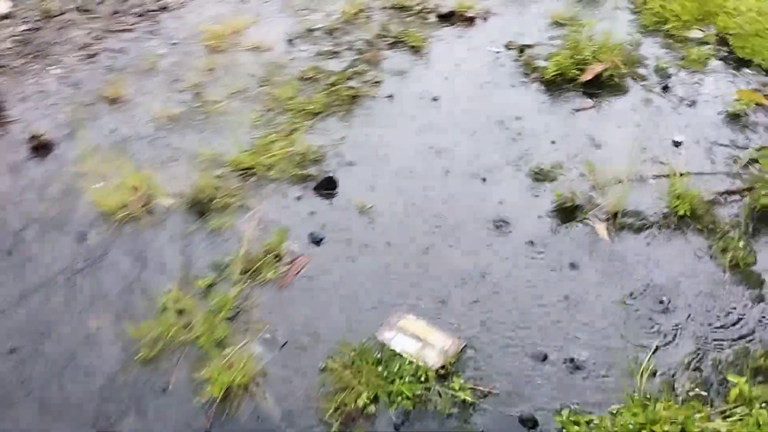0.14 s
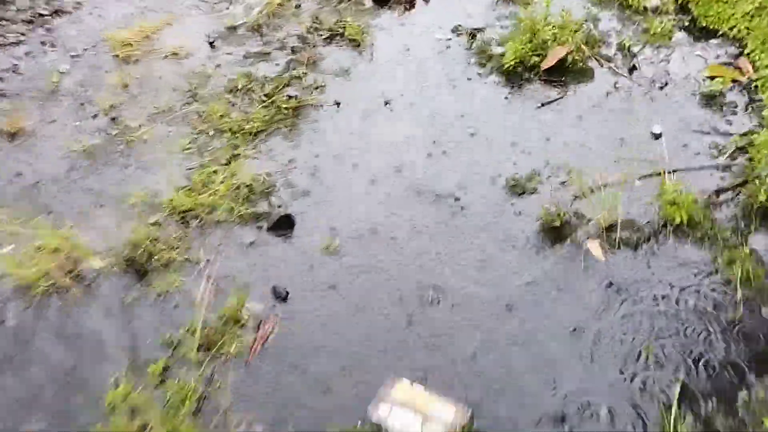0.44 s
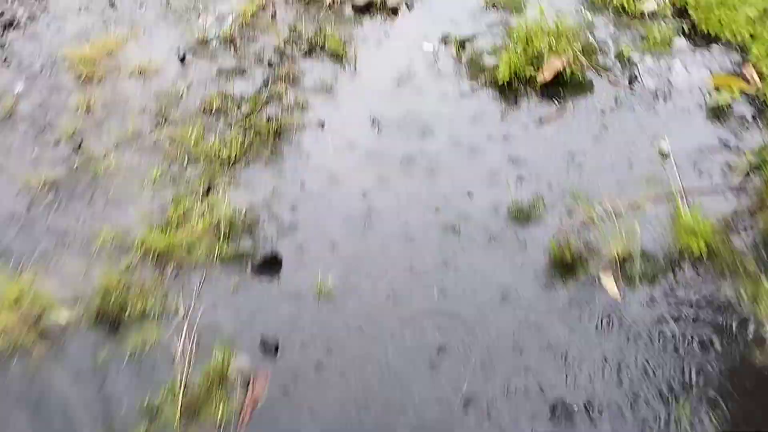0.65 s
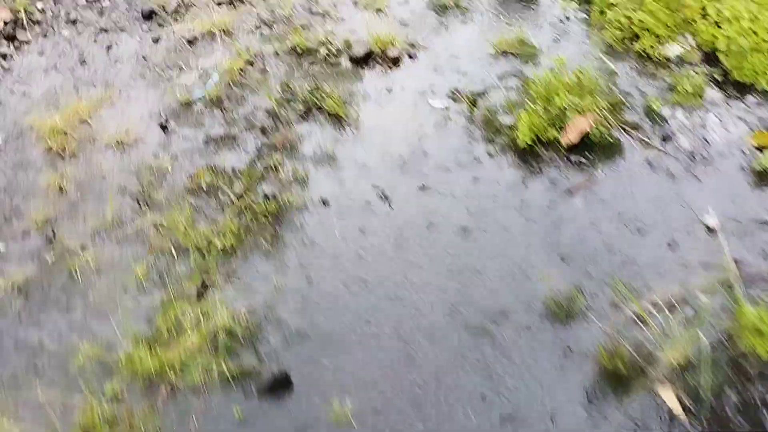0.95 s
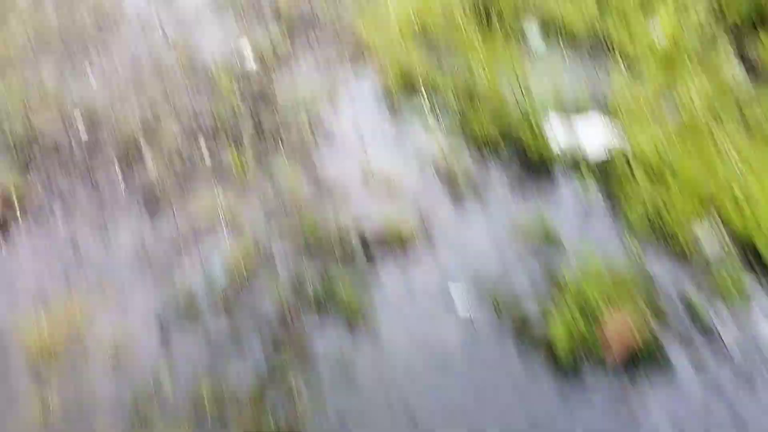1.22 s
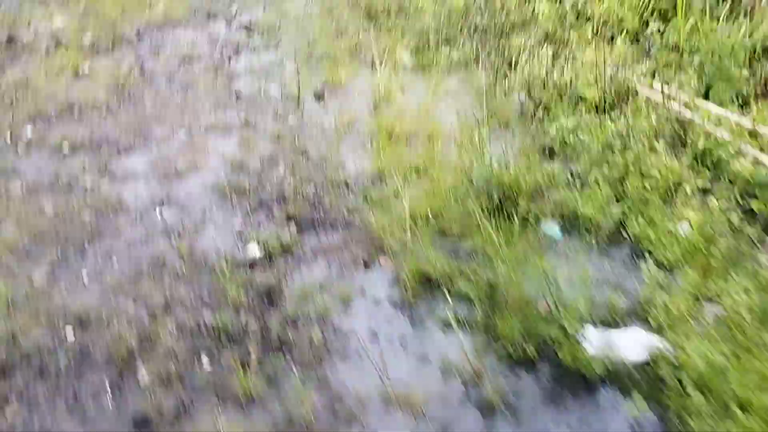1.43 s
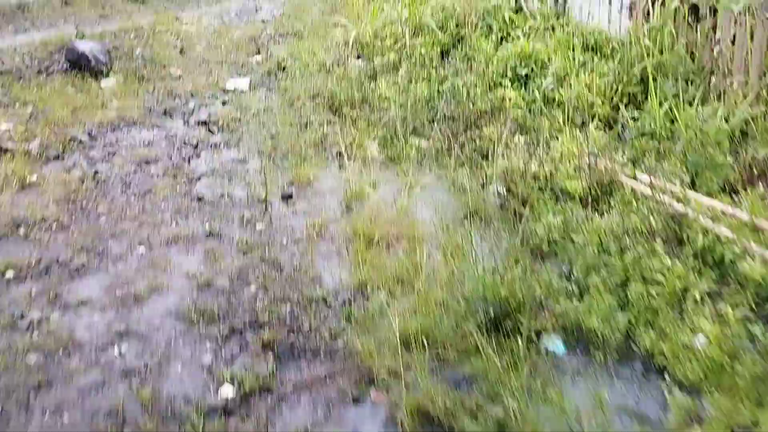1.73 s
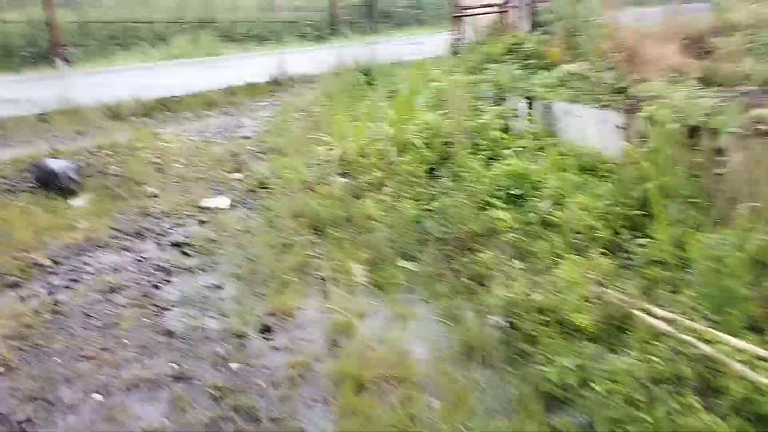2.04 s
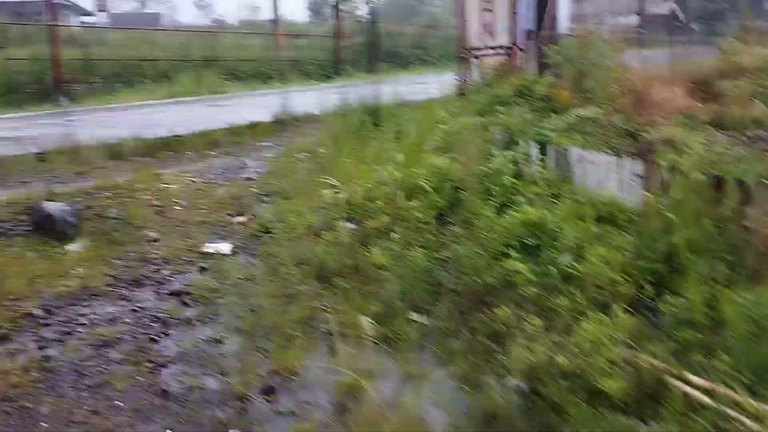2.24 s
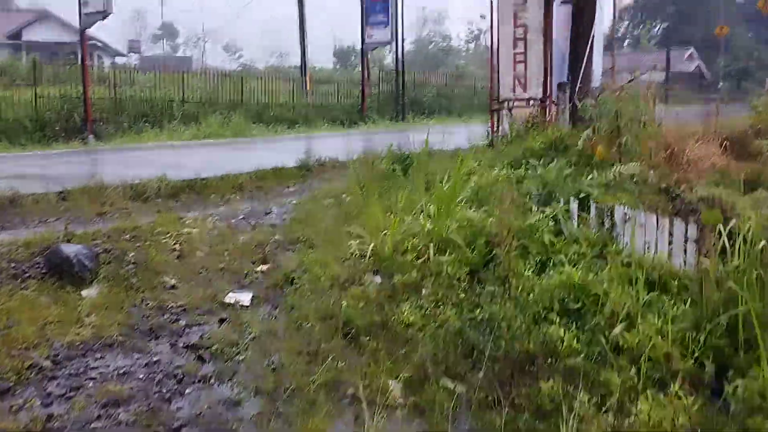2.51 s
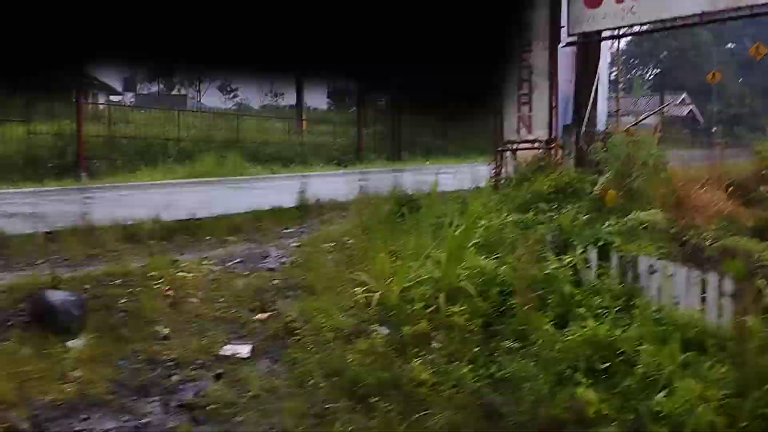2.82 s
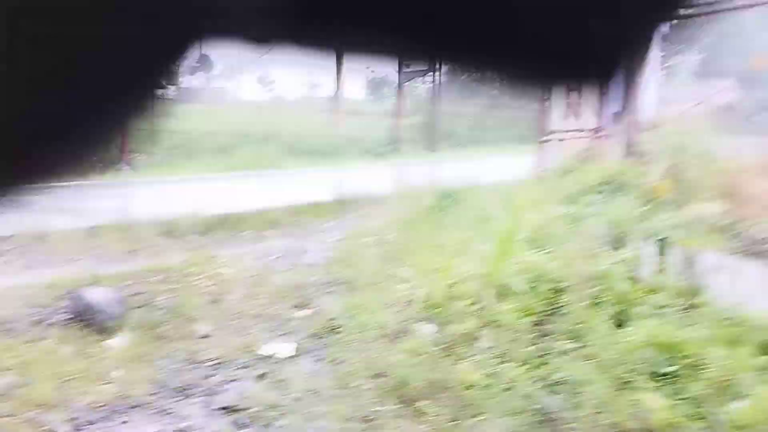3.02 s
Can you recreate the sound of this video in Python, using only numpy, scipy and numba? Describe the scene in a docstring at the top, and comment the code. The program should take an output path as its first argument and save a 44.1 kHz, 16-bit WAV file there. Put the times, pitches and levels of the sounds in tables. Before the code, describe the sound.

Heavy rain hisses steadily over puddles and grass while vehicle engines drone low on the left

```python
"""Beside a wet road bordered by grass, gravel and puddles, heavy rain reaches the two ports of a hand-held phone.
Filtered noise and damped rings form the dense wash; wavelets form near drops, noise bursts the splashes.
On the road to the left, filtered noise forms tyre rumble, and sines form a droning engine that leaves,
a second engine that draws near, a low hum and a tone that dies away. A soft bump strikes the phone;
at the end a hand closes over it, with two bands of ringing hiss from sines of randomly wavering pitch."""
import sys
import numpy as np
from scipy import signal
from scipy.fft import rfft, irfft
from scipy.io import wavfile
from scipy.ndimage import uniform_filter1d
from numba import njit

SR = 44100
rng = np.random.default_rng(int(sys.argv[2]) if len(sys.argv) > 2 else 0)


def transcribe(u):
    """Save the signal u as a 16-bit wav file named by the first command-line argument.

    u: samples, shape (n,) or (channels, n), limited to [-1, 1]; the rate is SR.
    q: integer samples, one column per channel.
    """
    v = np.clip(np.atleast_2d(u).T, -1, 1)
    q = np.round(v * 32767).astype(np.int16)
    wavfile.write(sys.argv[1], SR, q)


def field_ratio(decibels):
    """Amplitude ratio for a level in dB (20 dB per decade); scalars and array-likes work."""
    return 10 ** (np.asarray(decibels, dtype=float) / 20)


N = 139797

# Frequency response of the two phone ports: f/Hz, left gain/dB, right gain/dB
PORT_RESPONSE = [(573, -1, -1.5), (1260, -1.5, -1.5), (1500, -6, -2), (2240, -3.5, 3), (2780, -2.5, 0),
                 (4730, -1.5, -4), (6740, -3.5, 0), (7300, -6, -0.5), (8200, -11, -10.5), (9100, -6, -3),
                 (10000, -5.5, -6), (11030, -6, -23), (11780, 0.5, -5), (12300, 6.5, -6.5),
                 (14000, 7, -1.5), (15200, 6.5, -2)]
BAND_LIMIT_HZ = 15760  # upper band limit of the finished mix
LAG_S = 20 / 44100  # sound from the left reaches the right port later

# Spectral density of the rain wash, relative: f/Hz, level/dB per Hz
WASH_SPECTRUM = [(400, -5), (1000, -4), (2200, -6), (4000, -11.5), (7000, -18), (11000, -22),
                 (16000, -26.5)]
# Course of the wash: t/s, level/dB (before WASH_GAIN_DB), extra treble level/dB
WASH_COURSE = [(0, -44, -1.5), (.3, -45.5, 1), (.5, -45.5, -1.5), (1.2, -46, 2), (1.4, -43.5, 0),
               (1.6, -44.5, 0), (2.36, -43.5, -1), (2.8, -42.5, 1.5), (3.17, -42.5, 1)]
WASH_GAIN_DB, WASH_TREBLE_HZ = 4, 3300
# Flicker of the hiss; patter drops in each noise stream, their size spread, their level against the hiss
FLICKER_DB, DROPS_PER_S, SIZE_SPREAD_DB, PATTER_DB = 1.5, 1100, 3.5, -5
# Share of the power that arrives from the road side: f/Hz, share/1
ROAD_SHARE = [(100, 0.96), (300, 0.94), (600, 0.12), (1200, 0.64), (2200, 0.13), (5000, 0), (12000, 0.02)]

# Spectral density of the road rumble, relative: f/Hz, level/dB per Hz
RUMBLE_SPECTRUM = [(15, -40), (25, -17), (55, -9), (80, -1), (100, -6.5), (200, -7.5), (250, -7.5),
                   (340, -12), (1200, -29.5)]
# Course of the rumble: t/s, level/dB, extra level of the upper part/dB
RUMBLE_COURSE = [(0, -32, -2.5), (2.2, -30.5, -2), (3.17, -27, 0.5)]
RUMBLE_UPPER_HZ = 280

# Fundamental of the droning engine: t/s, level/dB
DRONE_LEVEL = [(0, -33), (.4, -31), (.63, -24), (.87, -28), (1.05, -25.5), (1.27, -19.5), (1.42, -28.5),
               (1.6, -22.5), (1.76, -18), (1.8, -21.5), (1.85, -41), (1.95, -34), (2.06, -41), (2.3, -44),
               (3.17, -65)]
DRONE_HZ, DRONE_SAG_HZ_PER_S = 72.33, 1.05  # initial pitch and its steady fall
# Low hum, before its random waver: t/s, f/Hz, level/dB
HUM_COURSE = [(0, 95.76, -34.5), (.4, 96, -35.5), (1.5, 102.8, -38.5), (2.2, 108, -36.5),
              (2.6, 112.2, -28.5), (3.0, 117.5, -31), (3.17, 113.4, -40)]
# Base rate of the nearing engine, multiplied by each order: t/s, f/Hz
ENGINE_RATE = [(0, 49.06), (1.1, 50.91), (2.0, 52.76), (2.6, 52.97), (3.17, 53.8)]
# Base level of the nearing engine, to which each order adds its own: t/s, level/dB
ENGINE_LEVEL = [(0, -40), (.6, -40), (1.3, -39.5), (1.4, -35), (1.5, -38.5), (1.6, -35.5), (1.85, -31.5),
                (1.93, -45.5), (2.05, -31), (2.13, -39.5), (2.25, -31), (2.33, -37.5), (2.45, -30),
                (2.53, -42), (2.58, -29.5), (2.7, -40), (2.8, -31.5), (2.89, -42), (3.0, -33.5),
                (3.17, -38)]
# Orders of the nearing engine: order/1, relative level at 2.5 s/dB, growth/dB per s
ENGINE_ORDERS = [(3, -6.5, -0.5), (4, -6.5, -0.5), (5, 3, 2.5), (6, -11.5, 2.5), (7, -10, 9), (10, -18, 15),
                 (17, -15.5, 10), (20, -16.5, 10)]
ENGINE_WAVER_DB = 3.5
FADING_TONE_HZ, FADING_TONE_DB, FADING_TONE_HOLD_S = 163, -34.5, 0.25

# Splashes of fine spray: t/s, envelope peak level/dB, relative level below 7 kHz/dB, t60/s
SPLASH_EVENTS = [(0.057, -43.5, -1, .02), (0.123, -37, 9, 0.043), (.203, -42.5, 8, 0.051),
                 (.2487, -45.5, 8, 0.083), (.578, -38, -10, .015), (0.603, -35.5, -3, 0.011),
                 (1.348, -41, 5, .08), (1.36, -45, 5, 0.061), (1.382, -43.5, 12, 0.072),
                 (1.431, -39, 2, .04), (2.1598, -36, -8, .025), (2.1774, -35.5, -4, 0.044),
                 (2.6635, -42, -6, .02)]
SPLASH_RIGHT_DB, SPLASH_RISE_S = -3, 0.011  # gain at the right port; time of a 60 dB rise
# Near drops: t/s, peak level/dB, left minus right level/dB, ring f/Hz, width/cycles, relative snap level/dB
DROP_EVENTS = [(.6037, -19.5, 3, 1080, .22, -11), (.7143, -24, -5, 1100, .3, -9),
               (.826, -30, -4, 1000, .32, -9), (.8575, -31, -3, 2400, .5, -8),
               (.872, -31.5, -5, 4000, 1.1, -12), (.9048, -23, -3, 1100, .26, -18),
               (1.3735, -29, -4, 1200, .5, -16), (1.393, -32, -4, 2400, 1.8, -12),
               (1.4178, -24.5, -6, 2000, .6, -16), (1.6275, -29, -5, 2100, .45, -7),
               (1.7066, -24, -5, 1700, .4, -20), (1.8904, -21, 3, 1500, .26, -24),
               (1.9668, -23, 2, 700, .3, -12), (2.0548, -24, 5, 2200, .7, -14),
               (2.176, -30, 0, 2020, 1.2, -14), (2.3184, -21.5, -4, 1450, .36, -22)]
SNAP_HZ = 4530  # sharp snap on top of each drop
BUMP_S, BUMP_PEAK_DB, BUMP_HZ = 1.9428, -14.5, 227

CUPPING_S, CUPPING_LENGTH_S, CUPPING_EDGE_S, CUPPING_RIGHT_DELAY_S = 2.895, .215, .04, .025
# Ringing hiss under the closing hand: centre f/Hz, waver of f/Hz, level/dB
RINGING_BANDS = [(2355, 55, -49), (5940, 105, -50.5)]


def curve(table, col, t):
    """Piecewise-linear interpolation of a table column in time."""
    a = np.array(table, float)
    return np.interp(t, a[:, 0], a[:, col])


def bins_hz():
    """Frequencies of the discrete Fourier transform."""
    return np.fft.rfftfreq(N, 1 / SR)


def over_hz(table, col=1):
    """Interpolation of a spectrum, linear in log frequency."""
    a = np.array(table, float)
    return np.interp(np.log(bins_hz() + 1), np.log(a[:, 0]), a[:, col])


def colour(x, gain):
    """Linear filtering: each Fourier component is multiplied by its gain."""
    return irfft(rfft(x) * gain, N)


def high_pass(corner_hz, order=4):
    """Zero-phase high-pass gain, rising with the given power of frequency."""
    return 1 / (1 + (corner_hz / (bins_hz() + 1)) ** order)


def unit(x):
    """Normalisation to unit rms."""
    return x / np.sqrt(np.mean(x ** 2))


def walk(rate):
    """Slow random modulation: Gaussian levels held 1 / rate seconds and smoothed twice; spread near 1."""
    k = int(SR / rate)
    held = np.repeat(rng.standard_normal(N // k + 1), k)
    return 1.21 * uniform_filter1d(uniform_filter1d(held, k), k)[:N]


def from_left(x):
    """Arrival-time difference: a wave from the left reaches the right port later."""
    return np.array([x, colour(x, np.exp(-2j * np.pi * bins_hz() * LAG_S))])


def spread(make):
    """Partial coherence: a shared part from the road side plus an independent part at each port."""
    share = np.clip(over_hz(ROAD_SHARE), 0, 1)
    shared = from_left(colour(make(), np.sqrt(share)))
    return shared + colour(np.array([make(), make()]), np.sqrt(1 - share))


def tone(hz, db):
    """Phase integration: a sine follows an instantaneous frequency and an rms level."""
    return np.sqrt(2) * field_ratio(db) * np.sin(2 * np.pi * (np.cumsum(hz) / SR + rng.random()))


def wavelet(a, width):
    """Gaussian-windowed oscillation: a dip with side lobes; a counts cycles from its centre."""
    return -np.cos(2 * np.pi * a) * np.exp(-(a / width) ** 2)


@njit
def grains(rows, n):
    """Damped free oscillation: a decaying ring per row of (sample, Hz, cycles, size)."""
    out = np.zeros(n)
    for r in rows:
        w = 2 * np.pi * r[1] / SR
        p, z = np.exp(1j * w - r[1] / SR / r[2]), r[3] + 0j
        for i in range(int(r[0]), min(n, int(r[0] + 6 * r[2] * SR / r[1]))):
            out[i] += z.imag
            z *= p
    return out


def rain_stream():
    """Superposition of impacts: far drops merge to flickering hiss, nearer ones patter as uneven rings."""
    u = rng.random((int(DROPS_PER_S * N / SR), 4))
    hz = 700 * 20 ** u[:, 1]
    size = field_ratio(-SIZE_SPREAD_DB * np.log(1.003 - u[:, 2])) * np.sqrt(hz)  # few large drops
    cycles = 1 + 3 * u[:, 3] ** 2
    patter = grains(np.c_[u[:, 0] * N, hz, cycles, size * np.sqrt(hz / cycles)], N)
    hiss = rng.standard_normal(N) * field_ratio(FLICKER_DB * walk(20))
    return hiss + field_ratio(PATTER_DB) * unit(patter)


def rain(t):
    """Spectral shaping of many impacts: partly coherent streams make a wash of varying level and treble."""
    wash = unit(colour(spread(rain_stream), field_ratio(over_hz(WASH_SPECTRUM))))
    treble = colour(wash, high_pass(WASH_TREBLE_HZ))
    wash = wash + treble * (field_ratio(curve(WASH_COURSE, 2, t)) - 1)
    return wash * field_ratio(curve(WASH_COURSE, 1, t) + WASH_GAIN_DB)


def rumble(t):
    """Broadband noise of tyres and far traffic: its upper part gains level as the rumble grows."""
    gain = field_ratio(over_hz(RUMBLE_SPECTRUM)) / (1 + (bins_hz() / 1200) ** 6)
    x = unit(colour(spread(lambda: rng.standard_normal(N)), gain))
    upper = colour(x, high_pass(RUMBLE_UPPER_HZ))
    x = x - upper + upper * field_ratio(curve(RUMBLE_COURSE, 2, t))
    return x * field_ratio(curve(RUMBLE_COURSE, 1, t))


def droning_engine(t):
    """Harmonic radiation from an exhaust: a sagging fundamental and its wavering second harmonic."""
    hz = DRONE_HZ - DRONE_SAG_HZ_PER_S * t
    second_db = -39 + 4 * walk(6.0) - 25 * np.clip(t - .9, 0, 1)
    return tone(hz, curve(DRONE_LEVEL, 1, t)) + tone(2 * hz, second_db)


def low_hum(t):
    """Frequency modulation: a low tone climbs, then dips at the end, with random waver of pitch and level."""
    hz = curve(HUM_COURSE, 1, t) * (1 + .02 * walk(10))
    return tone(hz, curve(HUM_COURSE, 2, t) + 2.5 * walk(15))


def nearing_engine(t):
    """Engine orders: exhaust tones at multiples of a rising rate, each wavering alone."""
    hz, db = curve(ENGINE_RATE, 1, t), curve(ENGINE_LEVEL, 1, t)
    mean_db = uniform_filter1d(db, SR // 2)
    out = np.zeros(N)
    for order, rel_db, growth in ENGINE_ORDERS:
        # order 5 follows the level closely, the others only its half-second mean
        base_db = db if order == 5 else mean_db + ENGINE_WAVER_DB * walk(7.92)
        order_hz = order * hz * (1 + .003 * walk(12))
        out = out + tone(order_hz, base_db + rel_db + growth * (t - 2.5) + 1.43 * walk(25.06))
    return out


def fading_tone(t):
    """Exponential decay: a steady pitch holds briefly, then falls by 100 dB in a second."""
    fall_db = 100 * np.clip(t - FADING_TONE_HOLD_S, 0, 1)
    return tone(np.full(N, FADING_TONE_HZ), FADING_TONE_DB + 2 * walk(11.2) - fall_db)


def engines(t):
    """Linear superposition: the vehicle tones share one path from the left."""
    return from_left(droning_engine(t) + low_hum(t) + nearing_engine(t) + fading_tone(t))


def splashes(t):
    """Transient broadband radiation: spray is grainy noise under exponential rises and decays."""
    s = np.array(SPLASH_EVENTS, float)
    age = t - s[:, :1]
    t60 = np.where(age > 0, np.maximum(s[:, 3:], .005), SPLASH_RISE_S)
    env = field_ratio(s[:, 1:2] - 60 * np.abs(age) / t60)
    grain = field_ratio(3.5 * rng.standard_normal((2, N // 20 + 1))).repeat(20, axis=1)[:, :N]
    noise = rng.standard_normal((2, N)) * grain
    low = 1 / (1 + (bins_hz() / 7000) ** 4)
    spray = colour(noise * env.sum(0), 1 - low)
    low_env = (env * field_ratio(s[:, 2:3])).sum(0)
    spray = spray + colour(noise * low_env, low * high_pass(1200))
    return spray * field_ratio(np.array([[0], [SPLASH_RIGHT_DB]]))


def near_drops(t):
    """Impulsive excitation: each single drop ticks as a short ring with a sharper snap on top."""
    out = np.zeros((2, N))
    for t0, db, pan_db, hz, width, snap_db in DROP_EVENTS:
        tick = wavelet((t - t0) * hz, width) + field_ratio(snap_db) * wavelet((t - t0) * SNAP_HZ, 0.42)
        out = out + field_ratio(db + np.array([[pan_db], [-pan_db]]) / 2) * tick
    return out


def bump(t):
    """Low-frequency impact: a soft bump on the phone, with a weaker, higher wavelet just ahead."""
    body = field_ratio(BUMP_PEAK_DB) * wavelet((t - BUMP_S) * BUMP_HZ, 0.39)
    return body + field_ratio(BUMP_PEAK_DB - 9.5) * wavelet((t - BUMP_S + 0.0019) * 650, 0.52)


def cupping(t):
    """Random frequency modulation: two narrow, grainy whistles swell under the hand, left port first."""
    age = t - CUPPING_S - np.array([[0], [CUPPING_RIGHT_DELAY_S]])
    bands = sum(tone(f + waver_hz * walk(400), db + 2 * walk(60)) for f, waver_hz, db in RINGING_BANDS)
    swell = np.clip(np.minimum(age, CUPPING_LENGTH_S - age) / CUPPING_EDGE_S, 0, 1)
    return swell * from_left(bands)


def scene():
    """Linear superposition of the sound fields at the two ports."""
    t = np.arange(N) / SR
    return rain(t) + rumble(t) + engines(t) + splashes(t) + near_drops(t) + bump(t) + cupping(t)


def top_cut(x):
    """Nothing passes above the cut-off."""
    return signal.sosfilt(signal.butter(12, 15740, fs=SR, output="sos"), x)


def record(dry):
    """Frequency response: each port colours the sound; a band limit then removes the top."""
    gain = field_ratio(np.array([over_hz(PORT_RESPONSE, col=1), over_hz(PORT_RESPONSE, col=2)]))
    mix = colour(dry, gain * (bins_hz() < BAND_LIMIT_HZ))
    return top_cut(mix)


dry = scene()
out = record(dry)
transcribe(out)
```